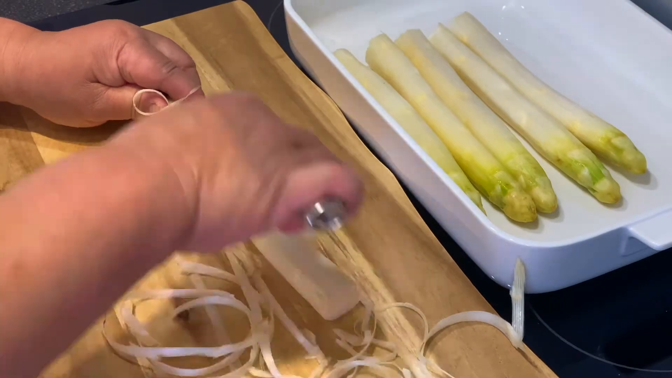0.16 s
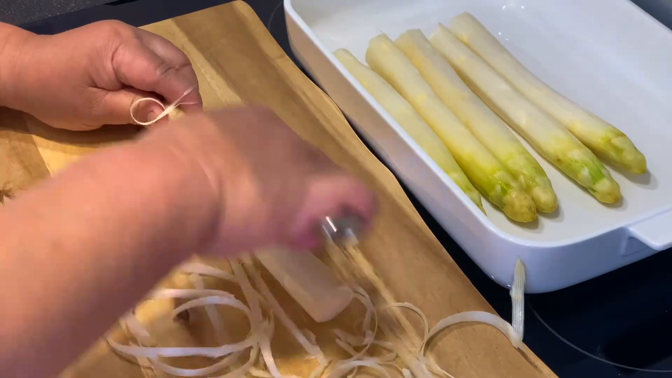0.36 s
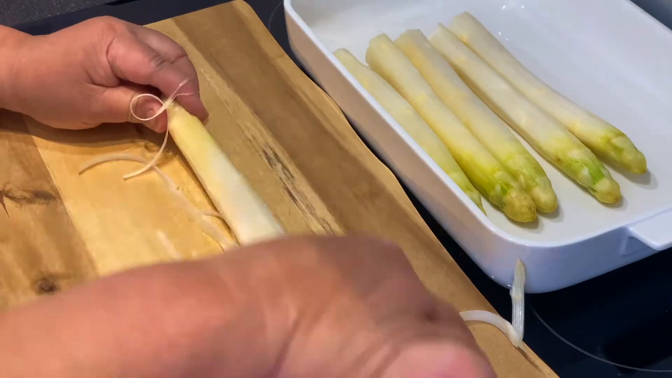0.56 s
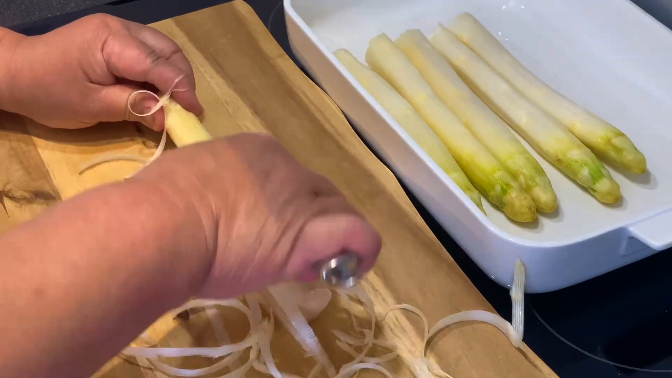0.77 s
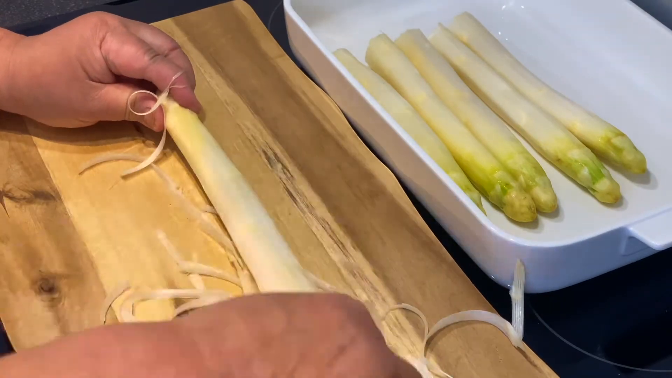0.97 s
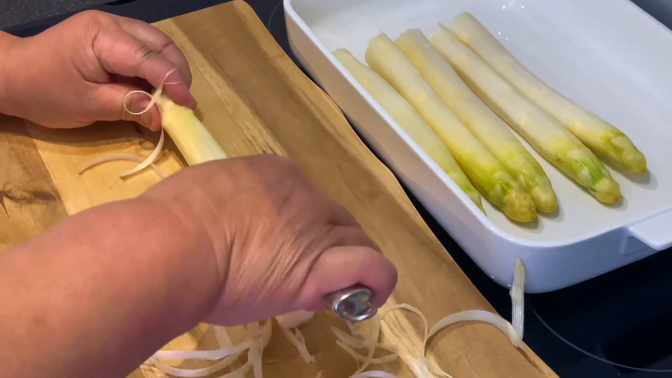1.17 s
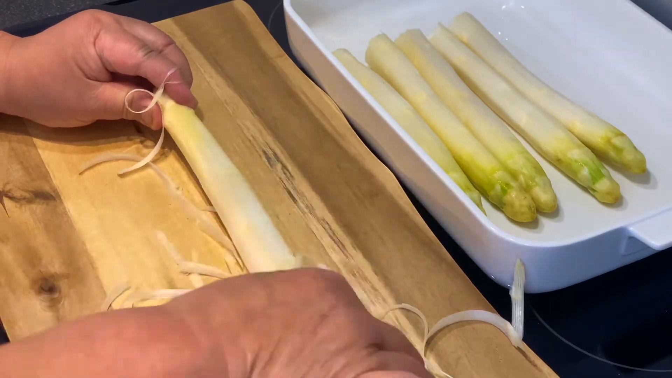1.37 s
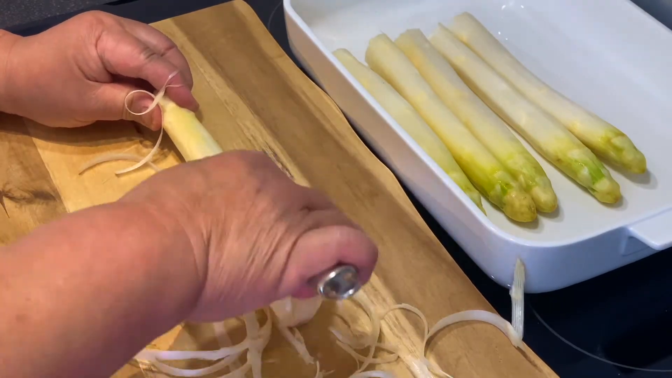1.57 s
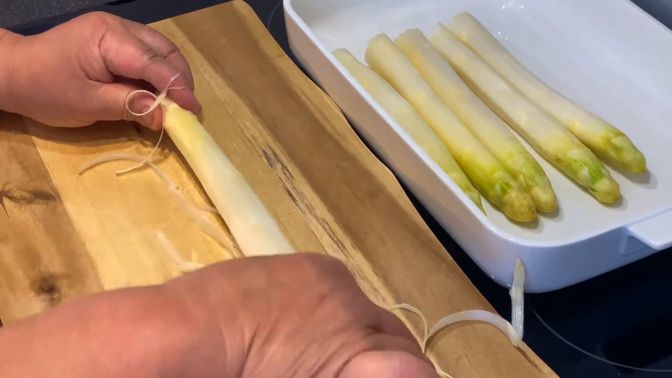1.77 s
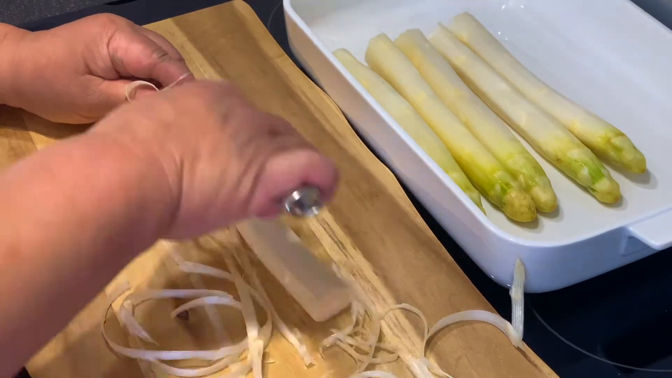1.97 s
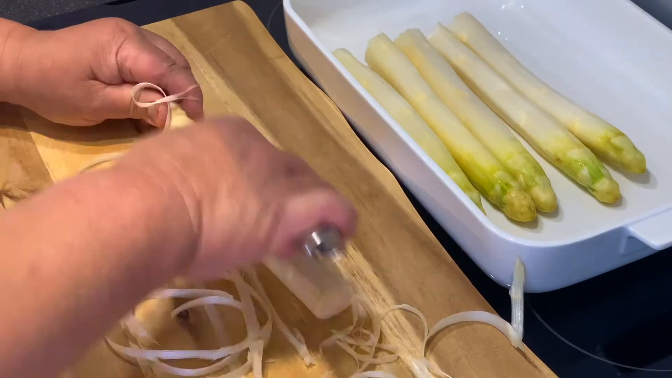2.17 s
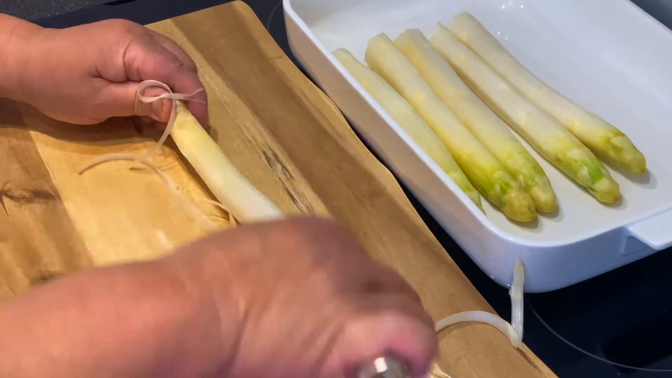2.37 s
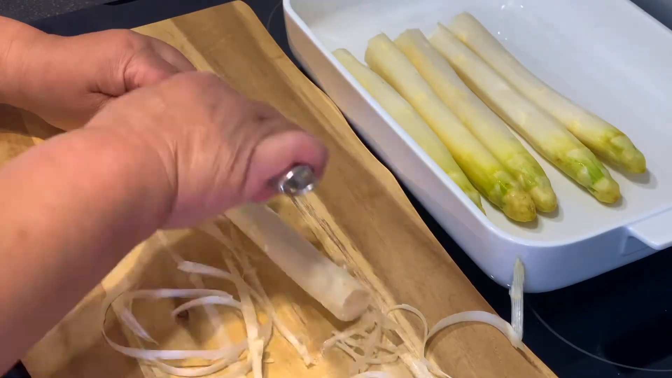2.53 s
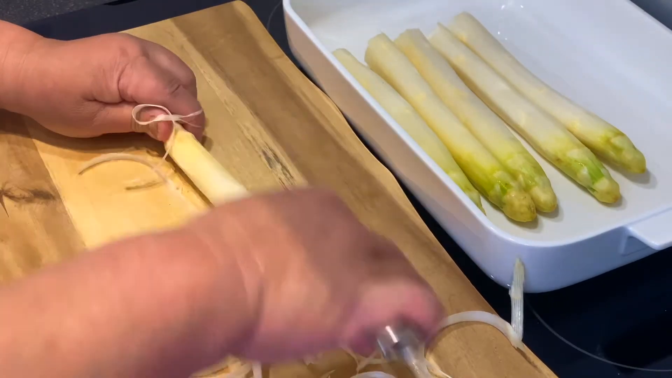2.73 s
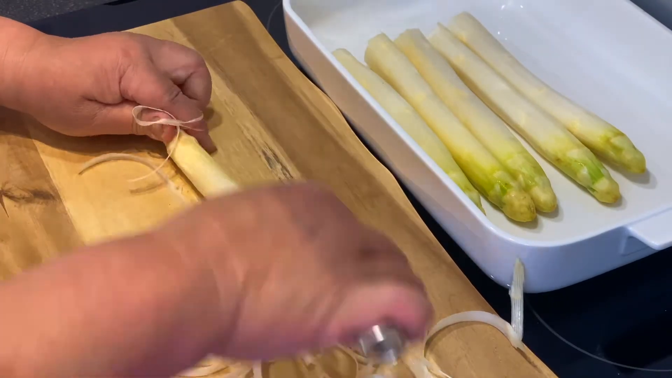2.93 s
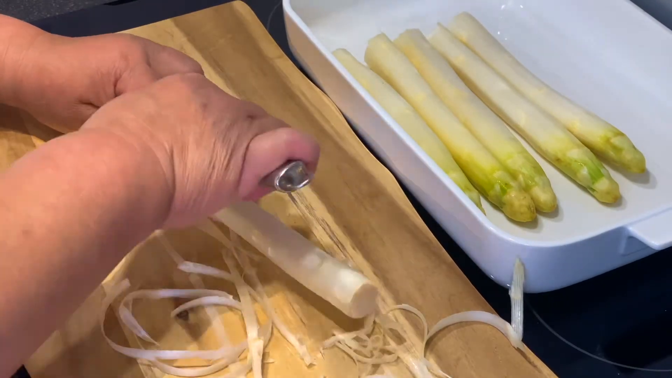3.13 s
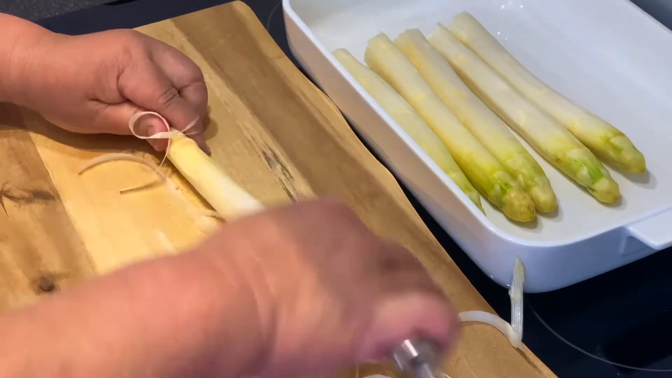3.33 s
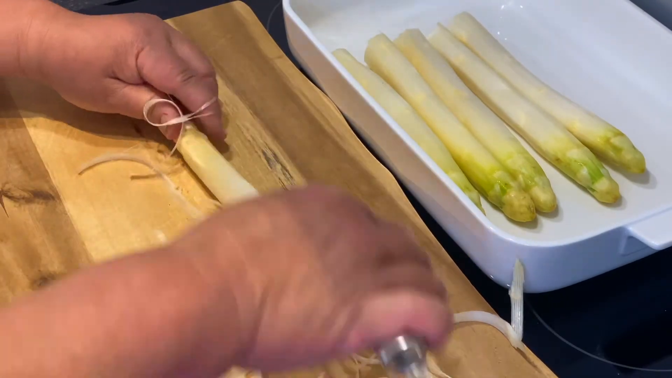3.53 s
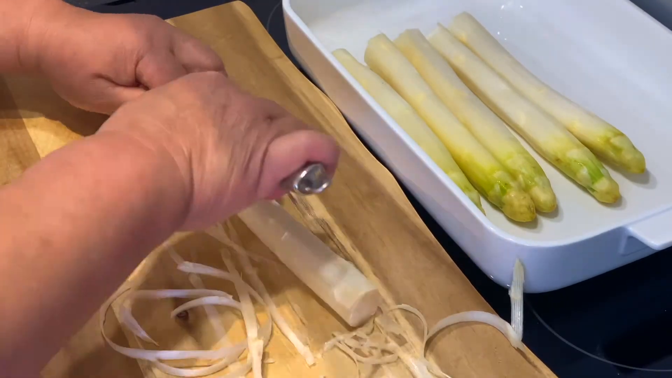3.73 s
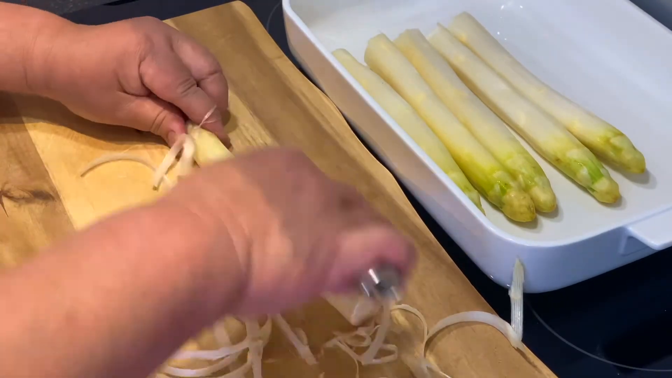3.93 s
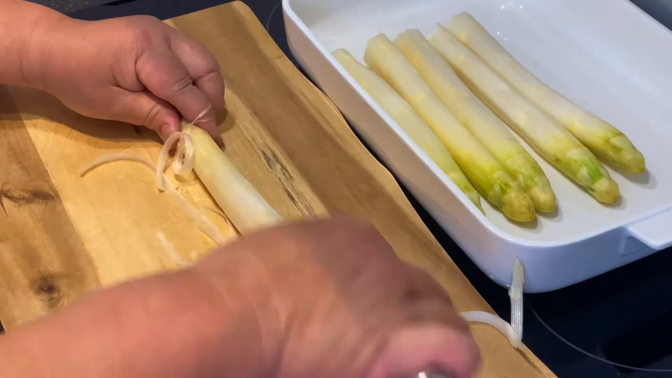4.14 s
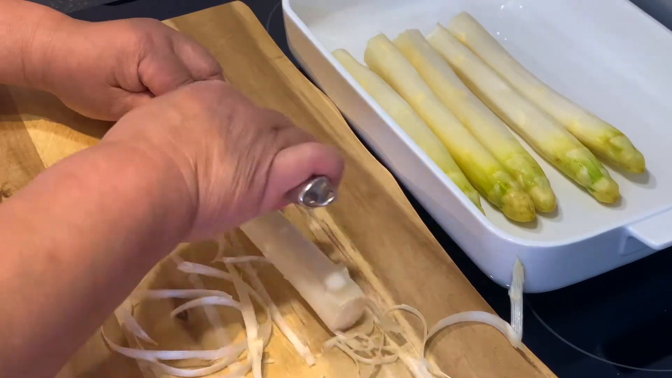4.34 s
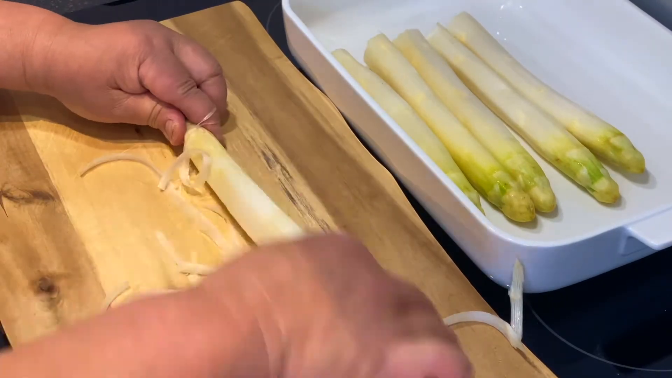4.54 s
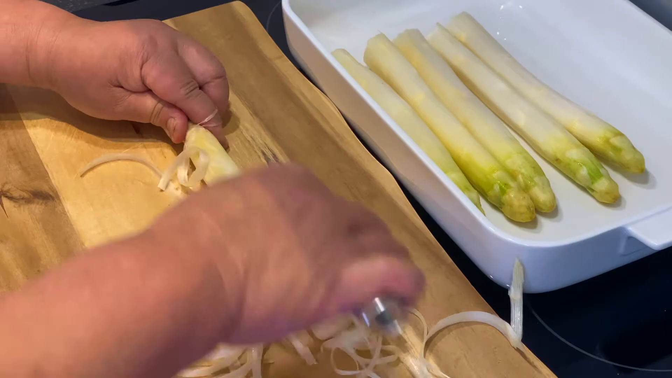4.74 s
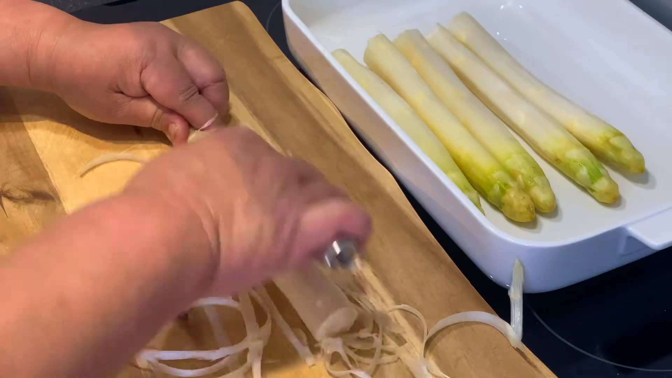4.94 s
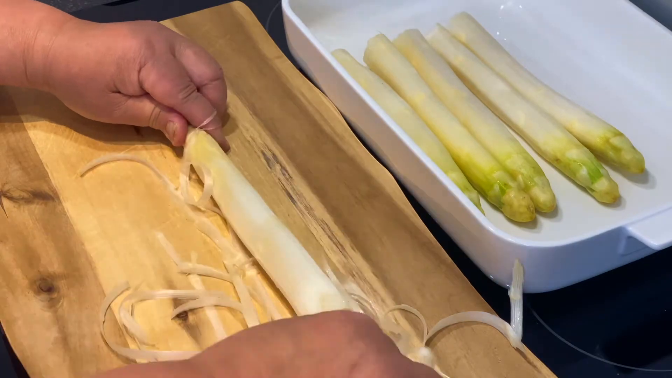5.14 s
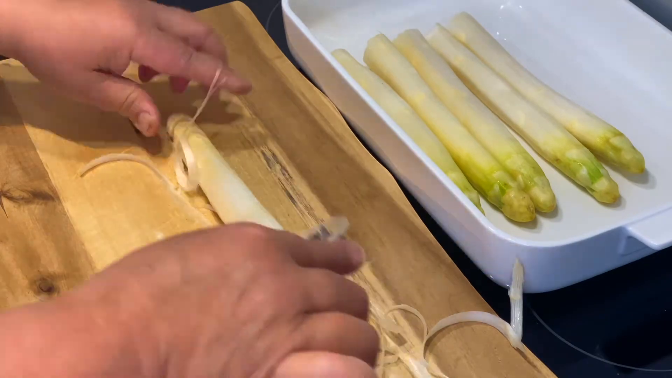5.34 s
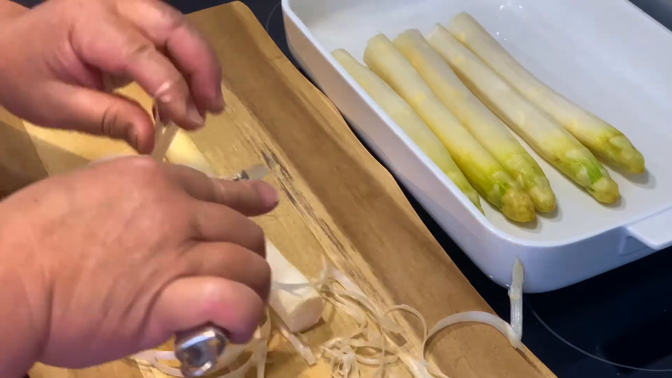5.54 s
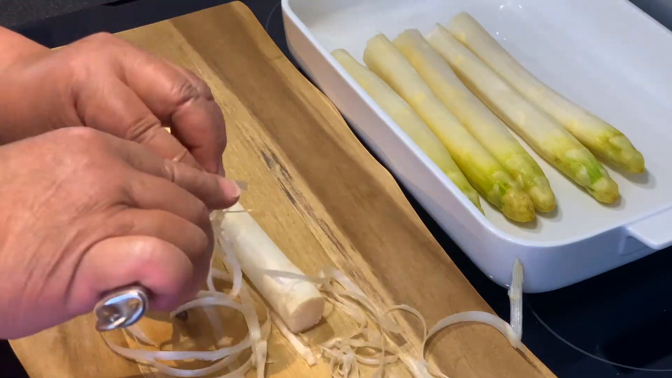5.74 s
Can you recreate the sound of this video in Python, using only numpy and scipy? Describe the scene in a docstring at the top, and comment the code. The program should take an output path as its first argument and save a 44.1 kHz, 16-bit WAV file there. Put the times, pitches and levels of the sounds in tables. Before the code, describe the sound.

Ten brisk peeling strokes: steel clack, wet fibrous rasp with a falling squeaky note, crisp snap off the end, then quiet fingering of peel.

```python
"""A swivel peeler strips asparagus on a wooden board in a kitchen, near a pair of microphone ports.
First the peel rustles and the loose blade rattles softly: chattering noise bursts plus ringing steel modes.
Ten quick strokes follow: clacks, a rasp of fibre snaps driving a falling resonant note, a flick off the tip.
Under them the board thuds (noise slaps, wood modes), the worktop rumbles (swelling noise), the room rings on.
At the end the spear is put down, the arms lift off, and fingers turn the spear and stir the peel."""
import sys
import numpy as np
from scipy import signal
from scipy.fft import rfft, irfft, next_fast_len
from scipy.io import wavfile
from scipy.ndimage import uniform_filter1d

SR = 44100
rng = np.random.default_rng(int(sys.argv[2]) if len(sys.argv) > 2 else 0)


def digitize_waveform(pressure):
    """Quantize a signal to 16-bit integers and store it at the path in sys.argv[1].

    Rows of a 2-D input are taken as channels; values are limited to [-1, 1].
    """
    field = np.atleast_2d(pressure).T
    bounded = np.clip(field, -1, 1)
    quanta = np.round(bounded * 32767).astype(np.int16)
    wavfile.write(sys.argv[1], SR, quanta)


N = 260177
TIME_S = np.arange(N) / SR

# Strokes of the peeler. Each row: blade lands in seconds, leaves the tip in seconds, share of the way at
# which it bites (0-1), time constant of the bite in seconds, relative levels in dB of the rasp while skimming,
# the rasp in the cut and the singing of the blade, its pitch in the cut in Hz, relative levels in dB of the
# rubbing on wood and of the worktop rumble as the hand lands, presses and lets go.
STROKES = [(0.208, 0.394, 0.53, 0.0042, -66, -50.5, -53, 2340, -57.5, -49, -47, -45),
           (0.705, 0.855, 0.24, 0.0088, -69, -57.5, -60.5, 2377, -58.5, -42, -47, -37),
           (1.136, 1.243, 0.42, .01, -60, -50, -55.5, 2530, -50, -41.5, -50, -38),
           (1.526, 1.648, 0.5, 0.011, -57.5, -51.5, -52.5, 2400, -54.5, -47, -51, -38.5),
           (2.0, 2.21, 0.59, 0.008, -58.5, -46, -43, 2346, -48.5, -46.5, -47.5, -41.5),
           (2.509, 2.707, 0.58, 0.011, -58.5, -43.5, -44.5, 2460, -48, -49.5, -47, -39),
           (3.066, 3.328, 0.46, 0.023, -62.5, -48, -47.5, 2445, -50.5, -53, -60, -44.5),
           (3.724, 3.959, 0.54, 0.044, -59, -49, -47, 2430, -54, -41, -39.5, -45.5),
           (4.324, 4.502, 0.43, 0.044, -61, -45, -46, 2490, -55, -58, -37, -39),
           (4.821, 5.023, 0.3, .012, -65.5, -48, -49.5, 2530, -61, -49, -46, -39.5)]
# Blade touches down, rattles in its holder, bites abruptly (2.126 s) or squeaks (3.2865 s).
# Each row: start in seconds, relative level in dB, tilt in dB per octave, relative ringing in dB,
# strongest ring in Hz.
CLACKS = [(0.048, -45, 0.5, 4, 10000), (0.1062, -46.5, -3.5, -15, 3350), (0.1238, -42, 0.5, -19, 4500),
          (0.177, -28.5, 1.5, -4.5, 9940), (0.1961, -28.5, 0, 1, 6520), (0.6963, -24.5, -0.5, -7, 3150),
          (0.7222, -27, 2, -3, 6050), (1.1311, -23.5, 0.5, -3.5, 2420), (1.5175, -30, -2, -0.5, 10120),
          (1.5242, -21.5, .5, -14, 9930), (1.535, -27, 0, -3.5, 5835), (1.9927, -23, 10.5, -7.5, 3050),
          (1.9972, -28.5, -3, -4, 3130), (2.0554, -37, 4, 0, 4420), (2.126, -38.5, -8, -1, 3130),
          (2.5023, -24.5, 11, -1, 3070), (2.5107, -29, -2.5, -1, 2960), (3.055, -36, 2, 10.5, 6300),
          (3.0672, -28.5, 0.5, 6.5, 9650), (3.2865, -43, -8.5, -1.5, 2310), (3.696, -36, 2, -11, 10100),
          (3.7225, -31, 3.5, -4, 10550), (3.7289, -36, -2, 9.5, 9270), (4.309, -37, 1.5, -14.5, 6160),
          (4.3231, -32, 0, 4, 3040), (4.726, -42, 0, 1.5, 7200), (4.82, -28, .5, 8, 10900),
          (5.4069, -48.5, 1, 3, 6600), (5.6086, -50.5, 0.5, -4.5, 6270), (5.7294, -36, 3.5, 1, 6800)]
# Strip tears off and the blade springs back. Each row: start in seconds, relative level in dB,
# tilt in dB per octave, relative ringing in dB, strongest ring in Hz.
FLICKS = [(0.396, -16, 0.5, -11, 9960), (0.832, -15.5, -1, -3, 2830), (1.2422, -13.5, -1, -0.5, 10060),
          (1.6496, -17, -1, -9.5, 3370), (2.2202, -23, 5, -7, 10200), (2.229, -27.5, -1, -18, 7550),
          (2.7073, -20.5, 3, -8.5, 10300), (2.722, -25.5, -1, -5, 6630), (3.318, -19, 4, -19, 10130),
          (3.956, -23, 1.5, -7, 10020), (3.967, -27, -0.5, -21, 9940), (4.5044, -30, -3.5, -4.5, 4200),
          (4.5077, -18.5, 1.5, -9.5, 5580), (4.526, -20, 5, -16.5, 9940), (5.0184, -18, -3, 2, 9850),
          (5.0236, -22, -2.5, -14.5, 10450), (5.0386, -19, 0.5, -15.5, 7260)]
# Rings of the steel peeler, damped by the fist. Each row: nominal pitch in Hz, relative level in dB, t60 in seconds.
PEELER_MODES = [(2400, -6, .025), (3000, -3, .035), (3190, 0, .04), (4140, -5, .03), (4420, -4, .03),
                (4660, -3, .035), (6220, -5, .03), (6660, -5, .025), (7260, -3, .03), (9700, -3, .02),
                (10020, 0, .03), (10340, -2, .025), (11000, -3, .02), (14250, -2, .03)]
# Spear or hand knocks on the board. Each row: start in seconds, relative level in dB,
# tilt in dB per octave, slap relative to the wood in dB.
KNOCKS = [(0.397, -37, 2, -32), (0.706, -36, -6, -20), (0.835, -33, -9, -4.5), (0.851, -29.5, -9, -6),
          (0.906, -39.5, -16, -13), (1.137, -26.5, -5, -20), (1.246, -29.5, -5, -9.5),
          (1.258, -32.5, -2.5, -6.5), (1.299, -41.5, -9.5, -12.5), (1.527, -36.5, -7.5, -17),
          (1.654, -43, 7, 4.5), (1.687, -52, -6, -6), (2.518, -36, -10, -23), (2.695, -29.5, -2, -14.5),
          (2.732, -38, -4, -20), (2.764, -36.5, -5.5, -18), (2.813, -41, -2.5, -11.5), (3.071, -45, 1, -13),
          (3.736, -36, -8, -35), (4.509, -47, 2, -15), (5.038, -18, 2.5, -7), (5.082, -40.5, -2.5, -7),
          (5.15, -41, 3.5, -15.5), (5.29, -42, -12, -28), (5.251, -37.5, -3, -30)]
# Rings of the board. Each row: nominal pitch in Hz, relative level in dB, t60 in seconds.
BOARD_MODES = [(96.9, -8.5, 0.089), (153, -8.5, 0.11), (180.7, -10.5, 0.27), (255.7, 4.5, 0.068),
               (288.5, 7.5, 0.081), (371, -16, 0.18), (480, -8, 0.065), (534, -13.5, 0.055),
               (677, -11, 0.063), (770, -20.5, 0.085), (1028, -23, 0.22), (1181, -21.5, 0.05)]
# Arms lean and shift on the board, lifting off near the end. Each row: time in seconds, relative level in dB.
LEANING = [(0.0, -46.5), (0.1, -50), (0.6, -53.5), (1.4, -50.5), (1.9, -54.5), (2.42, -53.5), (2.95, -53.5),
           (3.3, -49), (3.47, -52.5), (3.6, -50.5), (4.15, -60.5), (4.8, -56.5), (5.15, -51.5), (5.28, -53),
           (5.42, -78), (5.68, -62), (5.9, -61.5)]
# Spear is rolled and slid on the wood. Each row: start in seconds, length in seconds, relative level in dB.
SLIDES = [(4.6, 0.16, -69), (5.63, 0.245, -71)]
# Wet peel shifts under the fingers. Each row: start in seconds, length in seconds, relative level in dB.
RUSTLES = [(0.0, 0.059, -58.5), (0.11, 0.075, -69), (3.5, 0.029, -67.5), (3.575, 0.048, -76.5),
           (5.595, 0.055, -68.5), (5.71, 0.17, -71)]

# Spectra of clack, flick, fibre rasp, rub on wood, wet slap, worktop rumble, slide and quiet floor.
# Each row: frequency in Hz, relative level per Hz in dB.
CLACK_COLOUR = [(300, -33.5), (1100, -18.5), (1800, -9), (2400, -5.5), (3200, -0.5), (3700, -1),
                (4500, -1.5), (7000, -3), (8300, -4.5), (10000, -0.5), (11500, -4), (13000, -8),
                (14400, -6.5), (15800, -1.5)]
FLICK_COLOUR = [(300, -19), (1100, -18.5), (1700, -15), (2400, -2.5), (3200, 0), (3700, -5.5), (4500, 3),
                (5500, -0.5), (7400, 3), (8700, -7), (10000, 4), (12300, -3.5), (14400, 0), (15800, 2.5)]
RASP_COLOUR = [(300, -14.5), (1000, -4), (1600, -0.5), (2300, 5.5), (3300, 6.5), (3900, 2.5), (4500, 3),
               (5500, 1), (6700, 5), (8500, -1), (10000, 1), (12000, -3), (15500, -5.5)]
RUB_COLOUR = [(120, -31.5), (190, -6), (250, -3.5), (305, 2.5), (345, -9), (400, -5), (480, -20.5),
              (580, -15.5), (800, -20), (1500, -22), (3000, -37)]
SLAP_COLOUR = [(70, -13.5), (150, 2.5), (280, 7), (400, 5), (550, 5.5), (800, -4.5), (1100, -7.5),
               (1600, -8.5), (3000, -20), (8000, -35)]
RUMBLE_COLOUR = [(15, -25), (25, -4), (38, -2.5), (52, 2.5), (70, -7), (134, -8), (200, -22), (260, -46.5),
                 (440, -120)]
SLIDE_COLOUR = [(150, -23), (400, 12.5), (600, 7.5), (1000, 0), (1600, -20), (3000, -11), (8000, -32)]
QUIET_COLOUR = [(20, -28), (35, -4.5), (50, 11), (75, 2.5), (150, -17.5), (300, -14.5), (500, -17),
                (1000, -29.5), (2000, -29), (4000, -30), (8000, -39.5), (15000, -47.5)]

# Decay of the kitchen. Each row: frequency in Hz, t60 in seconds.
KITCHEN_T60 = [(100, 0.21), (400, 0.47), (1000, 0.64), (3000, 0.41), (7000, 0.37), (10000, 0.31),
               (15000, 0.2)]
# Phase lead of the left port. Each row: frequency in Hz, lead in turns.
PORT_LEAD = [(0, 0), (2500, 0), (2950, .05), (3700, .015), (6750, 0), (7400, -.19), (7950, -.26),
             (8520, -.5), (9250, -.86), (9850, -1), (10250, -1.01), (11000, -1.25), (11700, -1.47),
             (12300, -1.52), (13000, -1.74), (13700, -1.99), (14150, -2.02), (15000, -2.28), (15700, -2.5)]
# Likeness of the two ports. Each row: frequency in Hz, likeness (0-1).
PORT_LIKENESS = [(100, 0.97), (400, 0.86), (1200, 0.19), (2200, 1), (3200, 0.98), (4500, 1), (6700, 1),
                 (8000, 0.4), (8500, 1), (9100, .65), (10000, .995), (11100, 0.82), (12000, 1),
                 (13000, 0.26), (14000, 0.96), (15000, 0.53), (15700, 1)]
# Balance of the two ports. Each row: frequency in Hz, left minus right in dB.
PORT_BALANCE = [(40, -.8), (90, -1.5), (150, -2.9), (350, -2.9), (650, -.5), (2000, 0), (16000, 0)]

# Build-up time constants of the blows.
CLACK_RISE_S, FLICK_RISE_S, KNOCK_RISE_S = 0.0012, 0.001, 0.0035
# Skimming blade: note high and weak, sinking a little after the bite; less rub on the wood.
SKIM_HZ, SKIM_NOTE_DB, SKIM_RUB_DB = 3160, -24, -15.5
SINK_LAG_S, SINK_S = 0.0074, 0.0053
# Time the worktop takes to swell after the hand lands and after it lets go.
LAND_SWELL_S, RELEASE_SWELL_S = 0.028, 0.031
# Rub of the resting spear: its level when the arms lean at LEAN_DB; share of their dB swing it follows.
LEAN_DB, REST_RUB_DB, RUB_FOLLOWS = -54, -65.5, 0.6
MOVE_FADE_S = 0.011
LOW_CUT_HZ, HIGH_CUT_HZ = 43, 15850


def rasp(rasp_db, sing_db, rub_db, width_hz, judder_db, toughness_db, wander, fade_s):
    """Blade skims, then bites: snapping fibres hiss, drive a note that sinks with the cut, and shake the board."""
    out = np.zeros((2, N))
    for start_s, end_s, bite_at, bite_s, skim_db, cut_db, note_db, cut_hz, wood_db, *_ in STROKES:
        length_s = end_s - start_s
        bite_time_s = bite_at * length_s
        t = np.arange(0, length_s + fade_s, 1 / SR)
        skim = 1 - step(t, bite_time_s, bite_s)
        sink = step(t, bite_time_s + SINK_LAG_S, SINK_S)
        note_hz = SKIM_HZ + (cut_hz - SKIM_HZ) * sink
        note_hz = note_hz * (1 + wander * unsteady(len(t), window_samples=400))
        contact = np.clip(np.minimum(t, t[-1] - t) / fade_s, 0, 1)

        judder = judder_db * unsteady(len(t), window_samples=110)
        toughness = toughness_db * unsteady(len(t), window_samples=700)
        snaps = amp(judder + toughness) * crackle(SR // 2, per_s=9000, spread_db=3)[:, :len(t)]

        hiss_gain = amp(cut_db + (skim_db - cut_db) * skim + rasp_db)
        hiss = hiss_gain * evened(coloured(snaps, RASP_COLOUR))
        singing = resonate(resonate(snaps, note_hz, width_hz), note_hz, width_hz)
        note = amp(note_db + SKIM_NOTE_DB * skim + sing_db) * evened(singing)
        wood_gain = amp(wood_db + SKIM_RUB_DB * skim + rub_db)
        wood = wood_gain * evened(coloured(snaps, RUB_COLOUR))
        add(out, start_s, contact * (hiss + note + wood))
    return out


def blade(rows, colour, rise_s, chatter_s, grain, scatter_db, scatter_s, boost_db):
    """Steel chatters for milliseconds; the peeler rings, and board and dish scatter the sound."""
    out, t = np.zeros((2, N)), np.arange(SR // 10) / SR
    attack = 1 - np.exp(-t / rise_s)
    for start_s, level_db, tilt_db, ring_db, strongest_hz in rows:
        contact_sizes = np.exp(grain * rng.standard_normal(len(t)))
        contacts = evened(rng.standard_normal((2, len(t))) * contact_sizes)
        scatter = evened(crackle(len(t), per_s=5100, spread_db=-4))
        scatter = amp(scatter_db) * scatter * np.exp(-t / scatter_s)
        burst = attack * (contacts * np.exp(-t / chatter_s) + scatter)
        chatter = coloured(burst, colour, tilt_db, size=1024)
        modes = favoured(PEELER_MODES, strongest_hz, boost_db)
        steel = attack * ring(modes, t, tilt_db, detune=0.012)
        add(out, start_s, amp(level_db) * (chatter + amp(ring_db) * steel))
    return out


def favoured(modes, centre_hz, boost_db):
    """The spot where the blade is struck favours the rings near one pitch."""
    hz, db, t60_s = np.transpose(modes)
    nearness = np.exp(-(np.log2(hz / centre_hz) / 0.15) ** 2)
    return np.transpose([hz, db + boost_db * nearness, t60_s])


def knocks(level_db, rise_s, slap_s):
    """Wet spear or hand slaps the wood; the blow swells into the low modes of the board."""
    out, t = np.zeros((2, N)), np.arange(SR // 4) / SR
    attack = 1 - np.exp(-t / rise_s)
    for start_s, knock_db, tilt_db, slap_db in KNOCKS:
        slap = coloured(rng.standard_normal((2, len(t))) * np.exp(-t / slap_s), SLAP_COLOUR)
        wood = ring(BOARD_MODES, t, tilt_db, detune=0.012)
        add(out, start_s, amp(knock_db + level_db) * attack * (wood + amp(slap_db) * slap))
    return out


def fingers(slide_db, rustle_db):
    """Fingers slide the spear on wood (steady noise) and stir the wet peel (crackle)."""
    peel = evened(coloured(crackle(N, per_s=3900, spread_db=-14.5), RASP_COLOUR))
    slides = amp(slide_db) * moves(SLIDES) * noise(SLIDE_COLOUR)
    return slides + amp(rustle_db) * moves(RUSTLES) * peel


def handling(rumble_db, rub_db):
    """Worktop rumbles as the hand lands, presses and lets go; the spear rubs on the board with it."""
    lean_db = np.interp(TIME_S, *np.transpose(LEANING))
    push_power = np.zeros(N)
    for start_s, end_s, bite_at, bite_s, *_, land_db, press_db, release_db in STROKES:
        bite_time_s = start_s + bite_at * (end_s - start_s)
        cutting = step(TIME_S, bite_time_s, bite_s) * (1 - step(TIME_S, end_s, bite_s))
        push_power += (amp(land_db) * swell(start_s, LAND_SWELL_S)) ** 2
        push_power += (amp(press_db) * cutting) ** 2
        push_power += (amp(release_db) * swell(end_s, RELEASE_SWELL_S)) ** 2
    pushes = np.sqrt(push_power)
    rumble_gain = amp(rumble_db) * np.hypot(amp(lean_db), pushes)
    rest_rub = amp(REST_RUB_DB + RUB_FOLLOWS * (lean_db - LEAN_DB))
    rub_gain = np.hypot(rest_rub, amp(rub_db) * pushes)
    return rumble_gain * noise(RUMBLE_COLOUR) + rub_gain * noise(RUB_COLOUR)


def kitchen(x, delay_s, count=3):
    """Decaying-noise tails of a small hard room; the moving arm keeps changing the paths that feed them."""
    t, out = np.arange(SR // 2) / SR, np.zeros((2, N))
    for k in range(count):
        hz, at_s, bins = signal.stft(rng.standard_normal((2, len(t))) * (t > delay_s), SR, nperseg=256)
        decay = np.exp(-np.log(1000) * at_s / read(KITCHEN_T60, hz)[:, None])
        tail = signal.istft(bins * decay, SR)[1]
        tail = np.float32(tail / np.linalg.norm(tail[0]))
        share = np.sqrt(2 / count) * np.cos(np.pi * (TIME_S / 2 + k / count))
        out += signal.fftconvolve(np.float32(x * share), tail, axes=1)[:, :N]
    return out


def noise(colour):
    """Two unrelated channels of steady coloured noise, rms 1."""
    return evened(coloured(rng.standard_normal((2, N)), colour))


def crackle(count, per_s, spread_db):
    """Random snaps: positive spread lets a few stand out, negative spread weakens some."""
    size = amp(spread_db * np.minimum(rng.exponential(1, count), 4))
    return size * rng.standard_normal((2, count)) * (rng.random(count) < per_s / SR)


def ring(modes, t, tilt_db, detune):
    """Dying modes; grip and place of contact change their pitch and strength from blow to blow."""
    hz, db, t60_s = np.transpose(modes)[:, :, None]
    tilt = tilt_db * np.log2(hz / np.median(hz))
    size = amp(db + tilt + rng.standard_normal(hz.shape))
    pitch_hz = hz * (1 + detune * rng.standard_normal(hz.shape))
    phase_turns = rng.random((2, len(hz), 1))
    waves = np.sin(2 * np.pi * (pitch_hz * t + phase_turns))
    decay = np.exp(-np.log(1000) * t / t60_s)
    return (size * decay * waves).sum(1) / np.linalg.norm(size)


def resonate(x, hz, width_hz):
    """A one-pole resonance that follows the curve hz: shift to 0 Hz, smooth, shift back."""
    turn = np.exp(2j * np.pi * np.cumsum(hz) / SR)
    pole = np.exp(-np.pi * width_hz / SR)
    return (turn * signal.lfilter([1 - pole], [1, -pole], x / turn)).real


def coloured(x, colour, tilt_db=0, size=8192):
    """Minimum-phase filter of unit energy with the given spectrum, tilted in dB per octave above 1 kHz."""
    hz = abs(np.fft.fftfreq(size, 1 / SR))
    tilt = tilt_db * np.log2(np.maximum(hz, 1000) / 1000)
    log_gain = np.log(amp(read(colour, hz) + tilt))
    taps = np.fft.ifft(np.exp(np.conj(signal.hilbert(log_gain)))).real[:size // 2]
    return signal.fftconvolve(x, taps[None] / np.linalg.norm(taps), axes=1)[:, :x.shape[1]]


def moves(rows):
    """Gain of short moves: each fades in, holds and fades out."""
    gain = np.zeros(N)
    for start_s, length_s, level_db in rows:
        to_edge_s = np.minimum(TIME_S - start_s, start_s + length_s - TIME_S)
        gain += amp(level_db) * np.clip(to_edge_s / MOVE_FADE_S, 0, 1)
    return gain


def step(t, at_s, width_s):
    """A smooth rise from 0 to 1 around at_s."""
    return (1 + np.tanh((t - at_s) / (2 * width_s))) / 2


def swell(start_s, peak_s):
    """Gain of a push: up to 1 after peak_s, then dying away."""
    u = np.maximum(TIME_S - start_s, 0) / peak_s
    return u * np.exp(1 - u)


def unsteady(count, window_samples):
    """Smooth random curve: noise averaged twice, scaled over half a second to rms 1."""
    once = uniform_filter1d(rng.standard_normal(SR // 2), window_samples)
    return evened(uniform_filter1d(once, window_samples))[:count]


def amp(db):
    """Decibels to gain."""
    return 10 ** (np.asarray(db) / 20)


def evened(x):
    """Scales to an rms of 1."""
    return x / np.sqrt(np.mean(x ** 2) + 1e-20)


def read(points, hz):
    """Reads a table along a log-frequency axis."""
    table_hz, value = np.transpose(points)
    return np.interp(np.log(hz + 1), np.log(table_hz + 1), value)


def add(mix, start_s, sound):
    """Adds a two-channel sound to the mix, cut off at its end."""
    part = mix[:, max(round(start_s * SR), 0):][:, :sound.shape[1]]
    part += sound[:, :part.shape[1]]


def scene():
    """Peeler, board, room and quiet floor: row 0 reaches both ports alike, row 1 sets them apart."""
    strokes = rasp(rasp_db=0.34, sing_db=-4, rub_db=-2, width_hz=410,
                   judder_db=-0.9, toughness_db=2, wander=0.014, fade_s=0.0129)
    clacks = amp(-4) * blade(CLACKS, CLACK_COLOUR, CLACK_RISE_S, chatter_s=0.0055, grain=0.29,
                             scatter_db=-16, scatter_s=0.035, boost_db=13.5)
    flicks = amp(-2) * blade(FLICKS, FLICK_COLOUR, FLICK_RISE_S, chatter_s=0.0045, grain=0.45,
                             scatter_db=-12, scatter_s=0.022, boost_db=13.5)
    board = knocks(level_db=1, rise_s=KNOCK_RISE_S, slap_s=0.0078) * amp([[0], [-4]])
    hands = handling(rumble_db=-3, rub_db=-19.5) + fingers(slide_db=0.5, rustle_db=-3.5)
    sent = amp(-12.5) * clacks + amp(-11) * flicks + amp(-10.5) * (strokes + board)
    room = kitchen(sent, delay_s=0.0048)
    quiet = amp(-65) * noise(QUIET_COLOUR)
    return strokes + clacks + flicks + board + hands + room + quiet


def record(dry):
    """Two ports whose likeness, lead and balance vary with frequency; then the band limits."""
    size = next_fast_len(N + SR // 4)
    hz = np.fft.rfftfreq(size, 1 / SR)
    shared, apart = rfft(dry, size)
    likeness = np.clip(read(PORT_LIKENESS, hz), 0, 1)
    spread = np.arccos(likeness) / 2
    balance = amp(read(PORT_BALANCE, hz) / 2)
    lead = np.exp(2j * np.pi * read(PORT_LEAD, hz))
    left = (np.cos(spread) * shared + np.sin(spread) * apart) * balance * lead
    right = (np.cos(spread) * shared - np.sin(spread) * apart) / balance
    low_cut = hz ** 6 / np.hypot(hz ** 6, LOW_CUT_HZ ** 6)
    ports = irfft(low_cut * np.array([left, right]), size)[:, :N]
    high_cut = signal.firwin(401, HIGH_CUT_HZ, window=("kaiser", 8), fs=SR)
    return signal.oaconvolve(ports, high_cut[None], "same", axes=1)


dry = scene()
out = record(dry)
digitize_waveform(out)
```